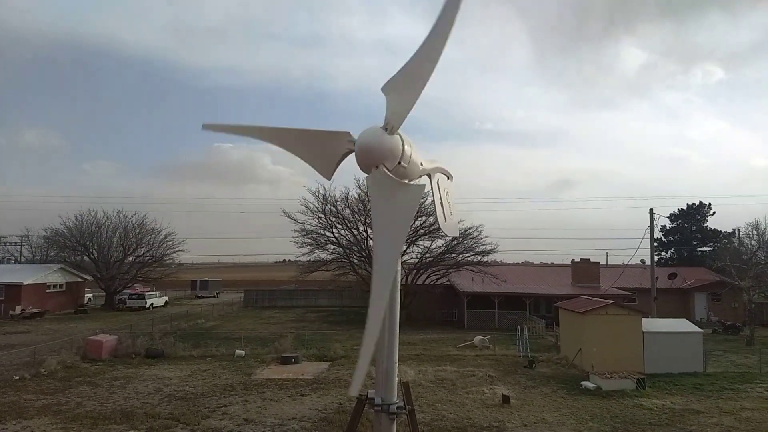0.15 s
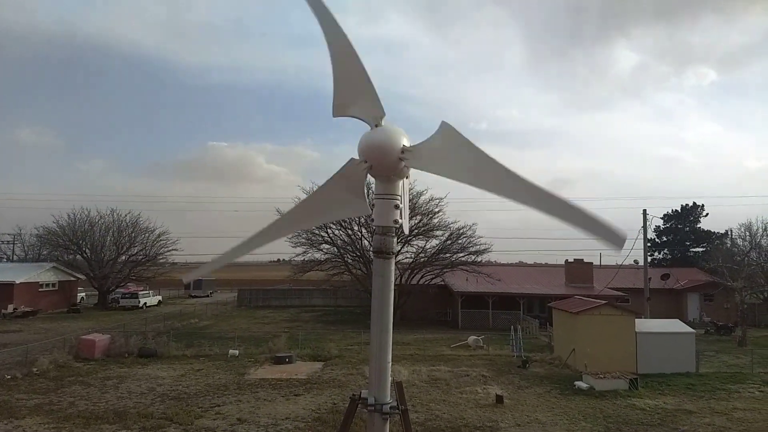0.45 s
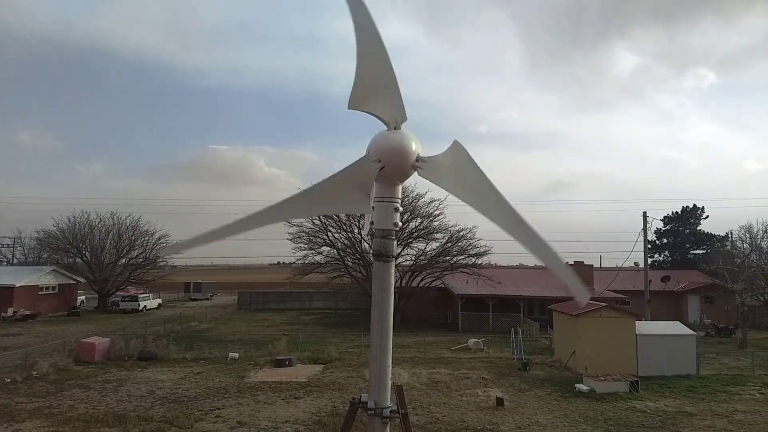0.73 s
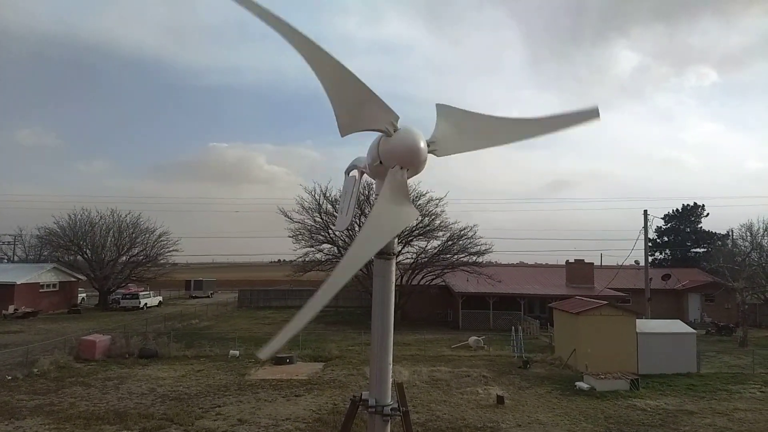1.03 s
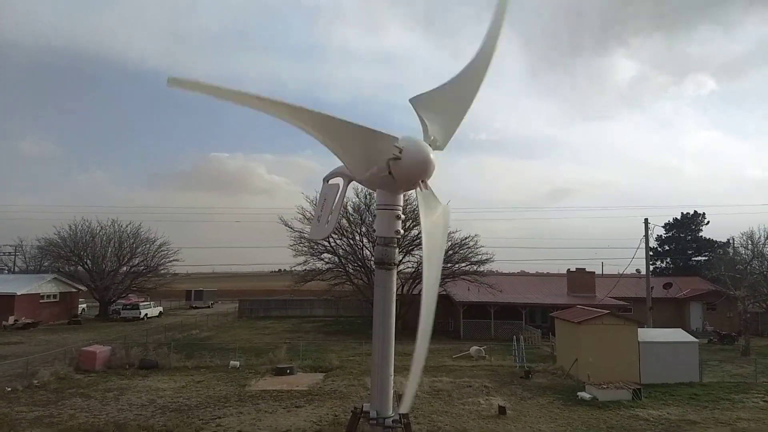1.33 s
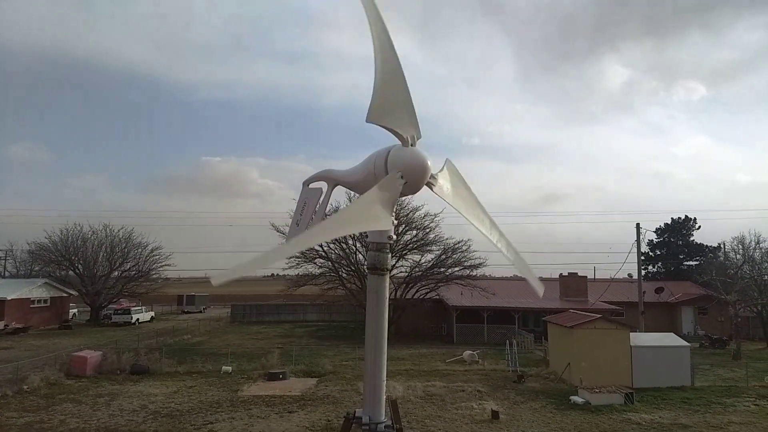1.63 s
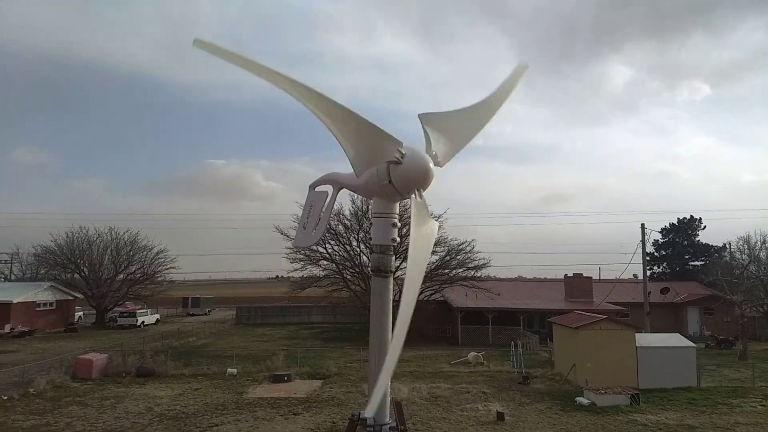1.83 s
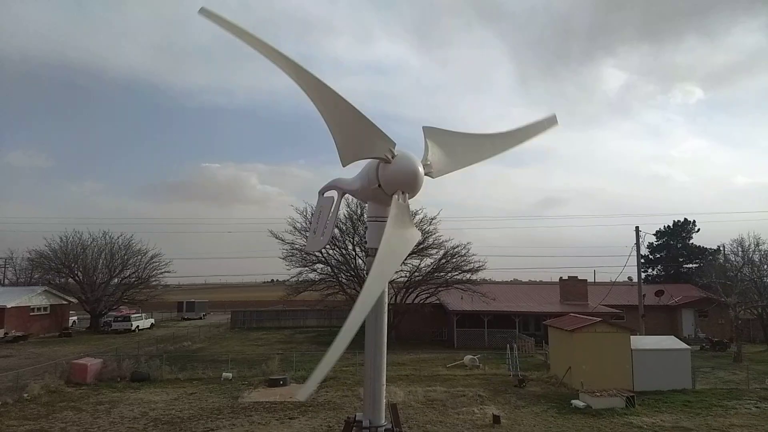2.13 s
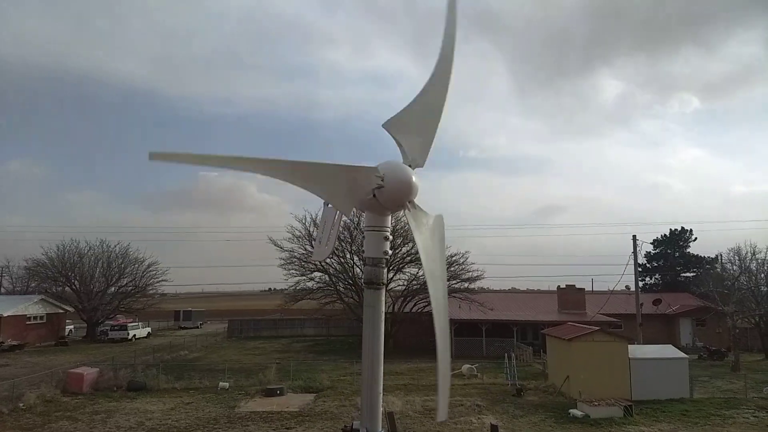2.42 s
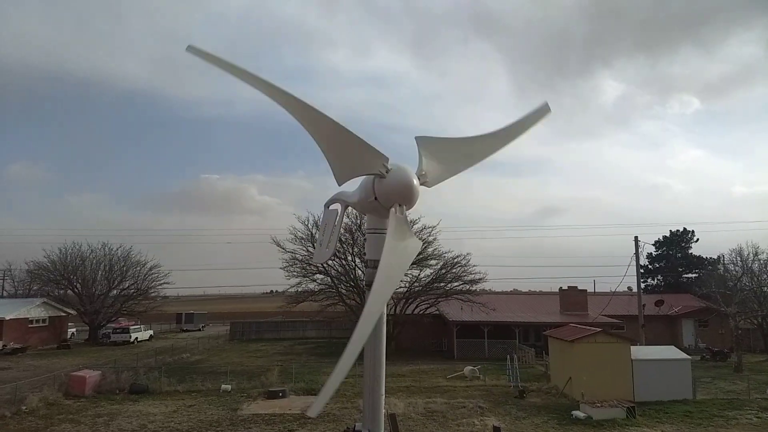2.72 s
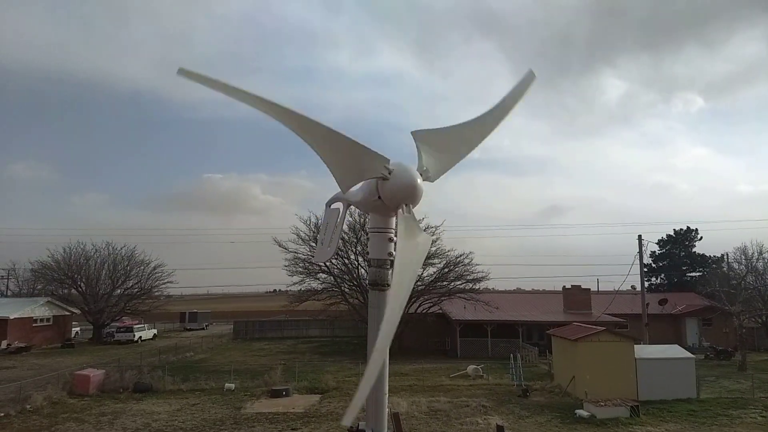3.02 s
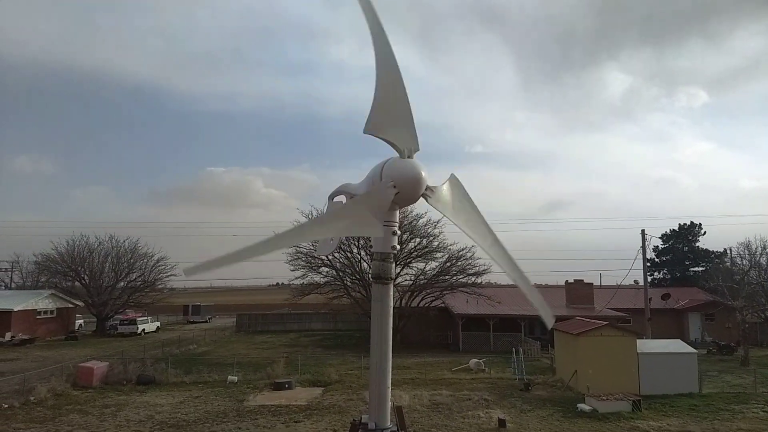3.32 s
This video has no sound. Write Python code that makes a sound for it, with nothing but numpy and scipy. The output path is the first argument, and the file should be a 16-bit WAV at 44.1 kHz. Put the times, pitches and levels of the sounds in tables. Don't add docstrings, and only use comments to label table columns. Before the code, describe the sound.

Irregular wind gusts knock a close stereo microphone outdoors, low and gritty, peaking just after the middle and thumping again near the end; a small spinning turbine adds only thin fluttering whistles and weak hum behind.

```python
import sys
import numpy as np
from scipy import signal
from scipy.fft import rfft, irfft
from scipy.io import wavfile
from scipy.ndimage import uniform_filter1d

SR = 44100
rng = np.random.default_rng(int(sys.argv[2]) if len(sys.argv) > 2 else 0)


def to_wav(sig):
    pcm = np.clip(np.atleast_2d(sig), -1, 1) * 32767
    pcm = np.round(pcm).astype(np.int16)
    wavfile.write(sys.argv[1], SR, pcm.T)


def convert_level_to_amplitude(level_db):
    exponent = np.asarray(level_db, float) / 20
    return 10 ** exponent


N = 152586
T = np.arange(N) / SR
HZ = np.fft.rfftfreq(N, 1 / SR)


def evened(x):
    return x / np.sqrt(np.mean(x ** 2) + 1e-20)


def filtered(x, response):
    return irfft(rfft(x) * response, N)


def noise(colour):
    hz, level_db = np.transpose(colour)
    response_db = np.interp(np.log(HZ + 1), np.log(hz + 1), level_db)
    return evened(filtered(rng.standard_normal(N), convert_level_to_amplitude(response_db)))


def wander(top_hz):
    return evened(filtered(rng.standard_normal(N), 1 / (1 + (HZ / top_hz) ** 4)))


def complex_wander(width_hz):
    return wander(width_hz) + 1j * wander(width_hz)


def hum():
    hum_hz, width_hz, level_db, steady = 129, 12.0, -31, 3.64
    flutter = steady + complex_wander(width_hz)
    return convert_level_to_amplitude(level_db) * (flutter * np.exp(2j * np.pi * hum_hz * T)).real


# [hz, level_db]
HISS_COLOUR = [(200, -6.5), (700, -5.5), (1500, -9.5), (3000, -13.5), (6600, -21), (7600, -27.5),
               (10000, -33.5), (16000, -34.5)]
# [time_s, left_db, right_db]
HISS_LEVEL = [(0, -40.5, -35.5), (.5, -38.5, -38.5), (1.0, -38, -33.5), (1.498, -35, -34.5),
              (2.3, -36.5, -37), (2.9, -34.5, -35), (3.46, -35, -31.5)]


def hiss():
    split_hz, patchy_db, treble_patch_hz, body_patch_hz = 5800, 1.82, 38.0, 15.5
    right_treble_db, right_treble_hz = 3.0, 11500
    treble_patches = convert_level_to_amplitude(patchy_db * wander(treble_patch_hz))
    time_s, *levels_db = np.transpose(HISS_LEVEL)
    out = []
    for level_db in levels_db:
        x = noise(HISS_COLOUR)
        treble = filtered(x, 1 / (1 + (split_hz / (HZ + 1)) ** 4))
        body = (x - treble) * convert_level_to_amplitude(patchy_db * wander(body_patch_hz))
        out.append(convert_level_to_amplitude(np.interp(T, time_s, level_db)) * (body + treble * treble_patches))
    out[1] = filtered(out[1], convert_level_to_amplitude(right_treble_db / (1 + (right_treble_hz / (HZ + 1)) ** 10)))
    return np.array(out)


# [time_s, passes_count]
ROTOR = [(-.066, 0), (.671, 13), (1.12, 21), (1.415, 26), (1.8, 32), (2.084, 36), (2.6, 43), (3.505, 55)]
# [hz_per_pass_rate, base_hz, width_hz, level_db, fall_share, lead_s]
WHISTLES = [
    (150, 11600, 900, -51, .08, 0),
    (480, 3300, 300, -56, .05, 0),
    (150, 8800, 500, -58, -.03, .02),
]
# [time_s, upper_db, lower_db, rising_db]
YAW = [(0, 1, -2, 0), (.33, 4, 0, 2), (.45, -4, 0, 0), (.9, -4, -2, 0), (.97, 5, -4, -2), (1.1, -1, -3, -3),
       (1.9, -6, -1, -5), (3.46, -3, 1, -2)]


def whistles():
    whistle_s, late_s, pitch_spread, vary_db = .004, .002, .04, 2.5
    left_db, right_db = -7., 1.5
    passes = np.interp(T, *np.transpose(ROTOR))
    rate_hz = uniform_filter1d(np.gradient(passes) * SR, size=9000)
    nearest = np.round(passes).astype(int)
    since_s = (passes - nearest) / rate_hz
    yaw_s, *yaws_db = np.transpose(YAW)
    out = np.zeros(N)
    for row, yaw_db in zip(WHISTLES, yaws_db):
        hz_per_rate, base_hz, width_hz, level_db, fall_share, lead_s = row
        pitch, level, late, glide = rng.standard_normal((60, 4))[nearest].T
        u = (since_s + lead_s - late_s * late) / whistle_s
        bend = 1 + pitch_spread * pitch - fall_share * (1 + glide) * np.tanh(u / 2)
        hz = (base_hz + hz_per_rate * rate_hz) * bend
        tone = (complex_wander(width_hz) * np.exp(2j * np.pi * np.cumsum(hz) / SR)).real
        pass_db = level_db + np.interp(T, yaw_s, yaw_db) + vary_db * level
        out += convert_level_to_amplitude(pass_db) * np.exp(-.5 * u ** 2) * tone
    return out * convert_level_to_amplitude([[left_db], [right_db]])


# [hz, level_db]
RUMBLE = [(20, -55), (55, -1), (130, -3.5), (300, -11), (600, -25), (1200, -49), (2500, -55.5),
          (16000, -74)]
# [time_s, left_db, right_db]
FLOW = [(0, -21.5, -15.5), (.6, -16, -18.5), (1.05, -18, -20), (1.3, -12.5, -15), (1.7, -18.5, -26.5),
        (1.9, -27, -18.5), (2.1, -11, -5), (2.4, -15, -19.5), (2.9, -17, -15.5), (3.46, -15.5, -20)]


def flow():
    shared, lag_s, lumpy_db, lumps_hz = 0.36, 0.0014, 2.6, 40
    time_s, left_db, right_db = np.transpose(FLOW)
    left, own = noise(RUMBLE), noise(RUMBLE)
    ahead = filtered(left, np.exp(2j * np.pi * HZ * lag_s))
    right = shared * ahead + np.sqrt(1 - shared ** 2) * own
    out = []
    for x, level_db in ((left, left_db), (right, right_db)):
        lumpy = evened(x * convert_level_to_amplitude(lumpy_db * wander(lumps_hz)))
        out.append(convert_level_to_amplitude(np.interp(T, time_s, level_db)) * lumpy)
    return np.array(out)


# [peak_s, length_s, level_db, bright_hz]
SLAPS = [
    (0.051, 0.0074, -3.5, 682),
    (.430, 0.0026, -1.5, 770),
    (1.803, 0.0032, 3, 1200),
    (2.087, 0.0043, 4, 1520),
    (2.202, 0.0021, -0.5, 1000),
    (3.204, 0.008, -1, 590),
]
# [peak_s, length_s, level_db, bright_hz]
SNAPS = [(.098, 0.0019, -12.5, 890), (.175, .004, -14, 800), (.308, 0.0044, -12, 800),
         (.474, 0.0038, -11.5, 900), (.603, .004, -18, 700), (.714, 0.0043, -2, 402),
         (.728, .004, -1.5, 504), (.776, 0.0035, -13, 900), (.793, 0.0028, 0, 810), (1.337, .003, -17, 880),
         (1.381, .003, -11, 890), (1.804, .005, -3, 400), (1.819, 0.006, -7.5, 1010),
         (1.829, 0.0044, -3.5, 1200), (1.992, 0.0054, -10, 800), (2.023, 0.0043, -1.5, 890),
         (2.07, 0.0053, 2, 1080), (2.077, 0.0049, 3, 900), (2.099, 0.0032, 2.5, 1300),
         (2.11, 0.0036, 3, 1110), (2.124, 0.0044, 2, 1100), (2.15, 0.0047, 3.5, 900),
         (2.225, 0.0029, -5.5, 1100), (2.362, .004, -17, 700), (2.73, 0.0047, -12, 694),
         (2.804, .004, -19, 700), (2.848, .004, -17, 700), (3.242, 0.0035, -12, 700),
         (2.156, .005, 10.5, 453), (3.207, .008, 1.5, 395), (.051, .004, -7.5, 704),
         (2.015, 0.0071, -7, 700), (1.803, 0.0017, -9, 3430), (1.815, .008, -18, 2970),
         (1.829, 0.0025, -13.5, 2970), (.43, 0.0021, -20, 2500), (.794, .002, -18, 2800),
         (2.11, .003, -9, 2800), (2.125, .003, -8.5, 2800), (.729, .006, -2, 330), (2.14, .012, -1, 650)]


def slaps(rows):
    size = 2048
    out = np.zeros(N)
    offset_s = (np.arange(size) - size // 2) / SR
    for peak_s, length_s, level_db, bright_hz in rows:
        b, a = signal.butter(3, [150, bright_hz], "band", fs=SR)
        x = signal.lfilter(b, a, rng.standard_normal(size))
        x = x * np.exp(-.5 * (offset_s / (.5 * length_s)) ** 2)
        start = round(peak_s * SR) - size // 2
        out[start:][:size] += convert_level_to_amplitude(level_db) * x / abs(x).max()
    return out


# [hz, level_db]
THUMP = [(20, -8), (40, -11), (60, 6.5), (110, 7.5), (200, -2.5), (350, -11.5), (700, -67)]
CRACKLE = [(100, -9.5), (220, 3.5), (430, 0.5), (900, -14.5), (1500, -26), (3000, -37.5), (6000, -74),
           (16000, -100)]
# [peak_s, length_s, thump_db, crackle_db]
LEFT_GUSTS = [(0.045, 0.018, -38, -37), (0.1, 0.022, -7, -14), (0.125, 0.0044, 0.5, -17.5),
              (0.183, 0.048, -6, -16.5), (0.236, 0.0047, -3.5, -21), (0.283, 0.073, -12, -23.5),
              (0.401, 0.022, -6.5, -36), (0.437, 0.012, -24, -40), (0.519, 0.025, -7, -28),
              (0.685, 0.023, -15, -24.5), (1.174, 0.031, -4.5, -21), (1.236, 0.04, -9.5, -11),
              (1.303, 0.021, -20, -12), (1.339, 0.0095, -28, -11.5), (1.387, 0.024, -26, -24),
              (1.471, 0.032, -35, -40), (1.565, 0.023, -6.5, -19.5), (1.695, 0.056, -5.5, -24),
              (1.803, 0.0079, -3, -42), (1.976, 0.028, -6, -40), (2.18, 0.034, -6, -17),
              (2.236, 0.0058, -7, -20), (2.27, 0.013, -7, -46), (2.305, 0.044, -4, -35),
              (2.462, 0.023, -6.5, -22), (2.686, 0.01, -5, -18), (2.737, 0.019, 2.5, -13),
              (3.09, 0.014, -4, -22), (3.327, 0.043, -7, -25), (3.387, 0.013, -18, -34),
              (3.434, 0.027, -4.5, -26),
    (1.265, 0.021, -26, -15),
    (1.4, 0.023, -16, -17),
    (2.5, 0.041, -15, -21),
]
RIGHT_GUSTS = [(0.052, 0.0092, 4, -11), (0.195, 0.028, -2.5, -18), (0.341, 0.033, -6.5, -20),
               (0.387, 0.04, -30, -35), (0.435, 0.012, 3.5, -15.5), (0.481, 0.022, 0, -11),
               (0.62, 0.053, -6.5, -29), (0.727, 0.02, 3.5, -12.5), (0.796, 0.022, 3, -6),
               (0.988, 0.013, -8, -24.5), (1.403, 0.021, -5.5, -30), (1.505, 0.02, -1.5, -19),
               (1.634, 0.027, -6.5, -37), (1.759, 0.019, -5.5, -20.5), (1.804, 0.0063, -37, -13),
               (2.026, 0.024, -19, -0.5), (2.104, 0.055, -0.5, -0.5), (2.155, 0.0077, 4, 1.5),
               (2.207, 0.015, 3, 0.5), (2.561, 0.03, -5, -18), (2.602, 0.007, -33, -32),
               (2.653, 0.032, -11.5, -39), (2.853, 0.042, -3, -23), (2.917, 0.027, -5, -21.5),
               (2.954, 0.014, -6, -31), (3.101, 0.02, -8.5, -31), (3.174, 0.026, -1, -31),
               (3.207, 0.01, 4, -4), (3.246, 0.015, -4.5, -12.5), (3.378, 0.038, -3.5, -20),
               (1.826, 0.048, -4, -9.5),
    (1.862, 0.017, -2, -5.5),
    (1.809, 0.0083, -13, -10),
    (2.233, 0.017, -2, -4),
    (3.44, 0.027, -1, -17),
    (2.04, 0.015, -13, -6.5),
    (2, 0.015, -2, -22),
]


def gusts(rows):
    grit_db, grit_hz, rise_share = 3.0, 300, 0.71
    out = np.zeros(N)
    low = noise(THUMP)
    high = noise(CRACKLE) * convert_level_to_amplitude(grit_db * wander(grit_hz))
    for peak_s, length_s, thump_db, crackle_db in rows:
        first = max(round((peak_s - 3 * length_s) * SR), 0)
        near = slice(first, round((peak_s + 3 * length_s) * SR))
        skew = np.where(T[near] < peak_s, rise_share, 1)
        for x, level_db, width in ((low, thump_db, .46), (high, crackle_db, .44)):
            bell = np.exp(-.5 * ((T[near] - peak_s) / (width * length_s * skew)) ** 2)
            burst = bell * x[near]
            out[near] += convert_level_to_amplitude(level_db) * burst / np.sqrt(np.sum(burst ** 2) / np.sum(bell ** 2))
    return out


def scene():
    left = gusts(LEFT_GUSTS)
    right = gusts(RIGHT_GUSTS) + slaps(SLAPS) + slaps(SNAPS)
    return hum() + hiss() + whistles() + flow() + np.array([left, right])


# [time_s, drop_db]
DUCKS = [
    (.053, 6.5),
    (0.434, 4),
    (.6, 2.5),
    (0.794, 3),
    (1.788, 4.),
    (1.835, 12.5),
    (2.156, 0),
    (3.212, 4.5),
]


def duck(x):
    start_db, recover_db_per_s, duck_s = -3.5, 9.0, 0.0032
    gain_db = start_db + recover_db_per_s * T
    for time_s, drop_db in DUCKS:
        gain_db = gain_db - drop_db / (1 + np.exp(np.clip((time_s - T) / duck_s * 4, -50, 50)))
    return x * convert_level_to_amplitude(gain_db)


def cross_subtract(x):
    share, fade_hz, lag_samples, lag_shrink = .82, 13700, 18.95, 0.067
    lag = lag_samples - lag_shrink * (HZ / 14000) ** 2
    cross = share / (1 + (HZ / fade_hz) ** 4) * np.exp(-2j * np.pi * HZ * lag / SR)
    return x - filtered(x[::-1], cross)


def gate(x):
    gate_db, treble_db, vary_db = -19, 11, 3.5
    mid_side = np.array([x[0] + x[1], x[0] - x[1]]) / 2
    z = signal.stft(mid_side, nperseg=2048)[2][:, :1024]
    power = (abs(z) ** 2).reshape(2, 256, 4, -1).mean(2)
    power = uniform_filter1d(power, size=3, axis=2)
    around = np.exp(uniform_filter1d(np.log(power.max(0) + 1e-20), size=40, axis=0))
    mood = uniform_filter1d(rng.standard_normal(power.shape), size=3, axis=2)
    mood = evened(uniform_filter1d(mood, size=4, axis=1))
    tilt = np.minimum(np.arange(256) / 105, 1)[:, None] ** 1.5
    keep = power > around * convert_level_to_amplitude(gate_db + treble_db * tilt + vary_db * mood) ** 2
    keep[:, :16] = True
    kept = np.pad(z * np.repeat(keep, 4, axis=1), ((0, 0), (0, 1), (0, 0)))
    mid, side = signal.istft(kept, nperseg=2048)[1][:, :N]
    return np.array([mid + side, mid - side])


def band_limit(x):
    return signal.sosfilt(signal.butter(12, 16420, fs=SR, output="sos"), x)


def record(dry):
    limit, edge_hz = 1.25, 15800
    x = duck(dry) * signal.windows.tukey(N, 100 / N)
    x = limit * np.tanh(cross_subtract(x) / limit)
    mix = gate(filtered(x, HZ < edge_hz))
    return band_limit(mix)


dry = scene()
out = record(dry)
to_wav(out)
```